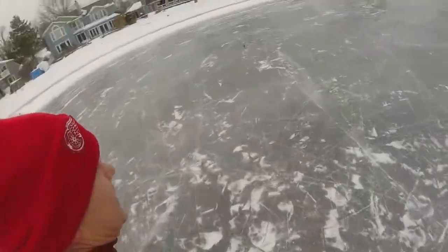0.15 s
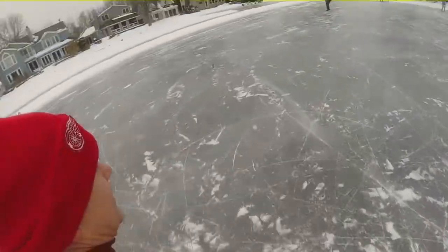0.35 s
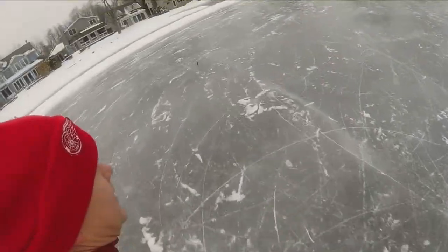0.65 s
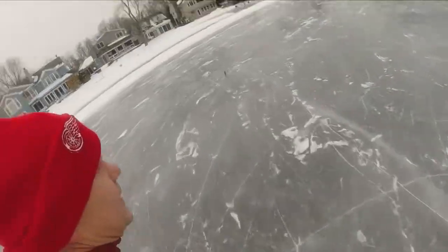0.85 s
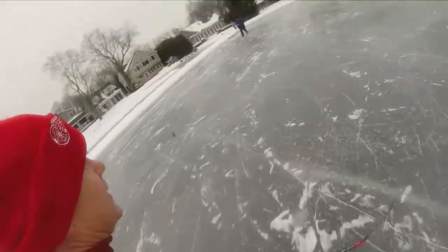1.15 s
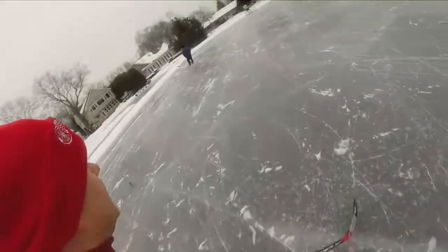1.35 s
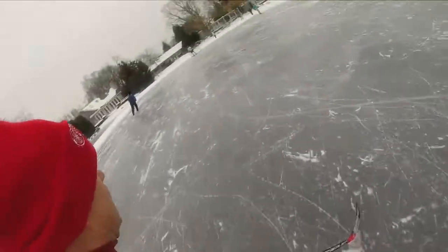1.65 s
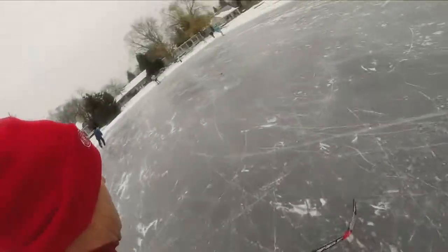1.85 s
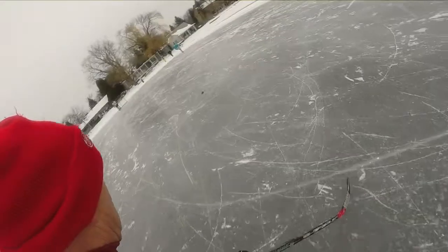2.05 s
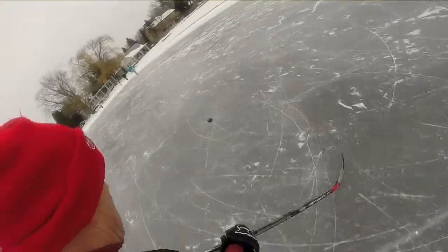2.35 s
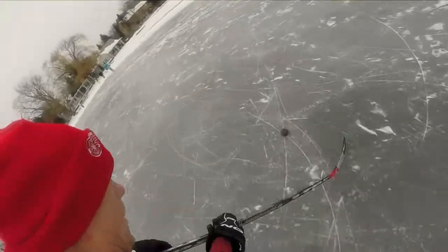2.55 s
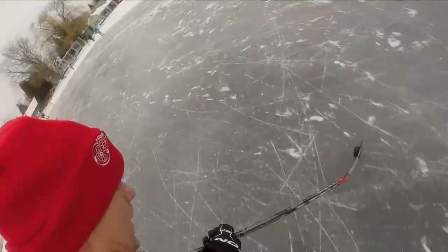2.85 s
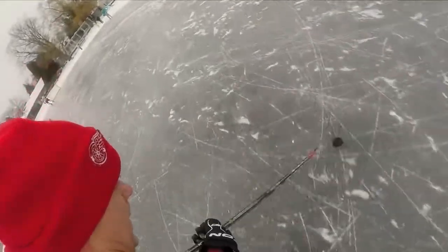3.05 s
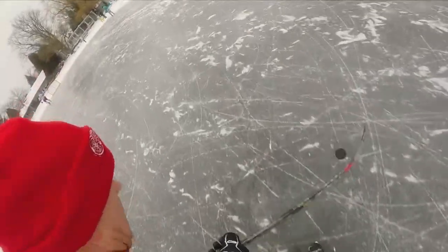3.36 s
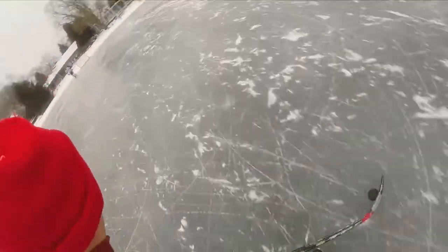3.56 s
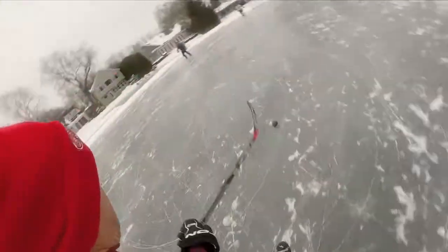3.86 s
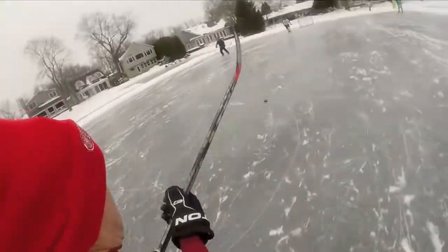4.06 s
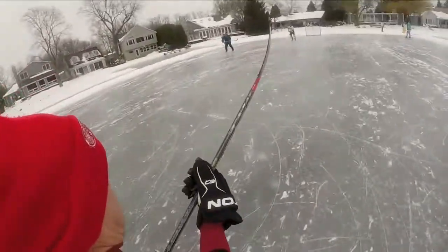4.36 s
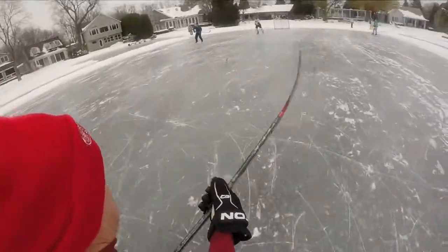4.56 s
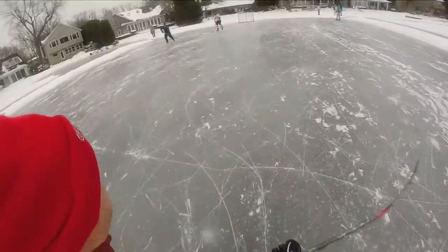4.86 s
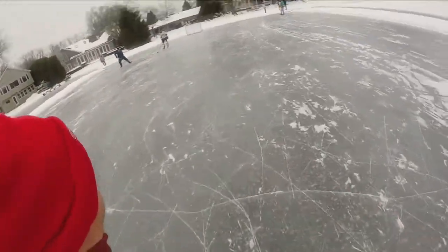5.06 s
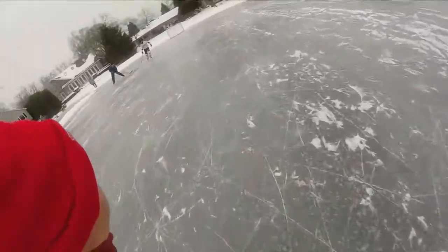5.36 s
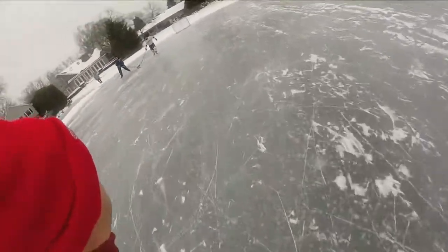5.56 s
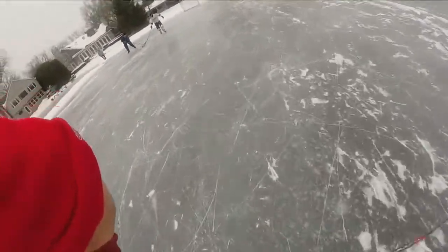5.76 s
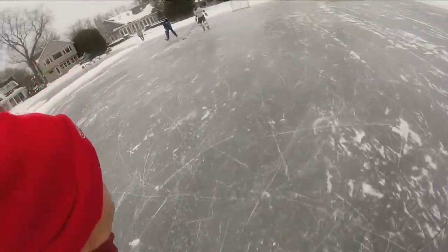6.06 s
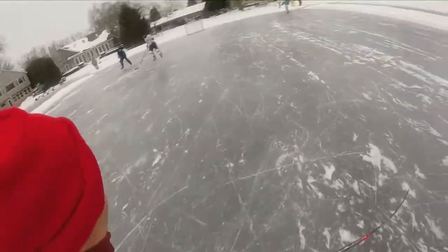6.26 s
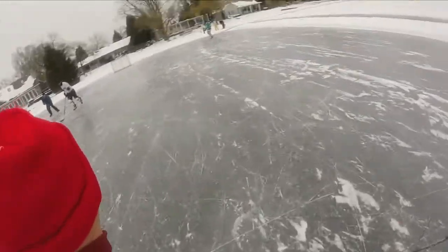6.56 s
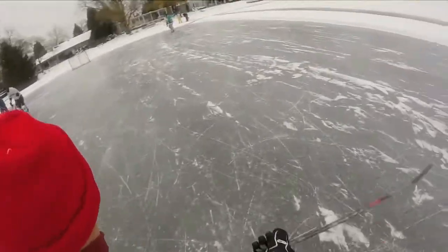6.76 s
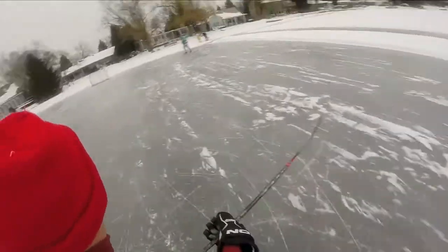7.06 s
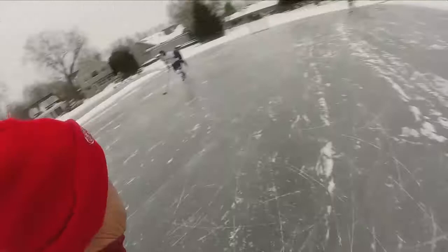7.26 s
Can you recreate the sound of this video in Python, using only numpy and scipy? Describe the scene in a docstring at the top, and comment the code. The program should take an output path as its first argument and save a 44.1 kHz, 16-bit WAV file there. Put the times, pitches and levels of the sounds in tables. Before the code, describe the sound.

Close, dry outdoor sound from a camera worn by a skater on rough lake ice. Blades crunch in short pushes, then glide with a thin, airy ring. A very loud stick crack lands after two and a half seconds, followed by lesser puck taps and a crisp spray of shaved ice. Grinding pushes and glides continue over low wind buffeting, ending with a heavier scrape.

```python
"""Skating with a stick and puck on rough ice

Blades grind in each push and sing in each glide: noise and tiny ice breaks pass through filters.
A stick cracks against puck and ice as fading tones with grit, and drags with a thin rasp.
Ice chips spray, cracks tick, toes scuff and bumps thud in the camera mount, over wind and faint hiss.
Loud peaks turn the gain down, and it slowly creeps back."""
import sys
import numpy as np
from scipy import signal
from scipy.fft import rfft, irfft, next_fast_len
from scipy.io import wavfile
from scipy.ndimage import uniform_filter1d, map_coordinates

SR = 44100
rng = np.random.default_rng(int(sys.argv[2]) if len(sys.argv) > 2 else 0)


def master(y):
    """Save y as 16-bit WAV."""
    cut = np.clip(np.atleast_2d(y).T, -1, 1)
    pcm = np.round(cut * 32767)  # scale
    wavfile.write(sys.argv[1], SR, pcm.astype(np.int16))


N = 326340

# Levels in the tables are relative: shares, trims and filters in the functions may still shift them.
# a skater leans on an edge: (most pressure t/s, rise t/s, fall t/s, grind level/dB, ring level/dB)
PUSHES = [(0.65, 0.095, 0.065, -50, -46.5), (0.74, 0.097, 0.088, -45.5, -60),
          (0.87, 0.031, 0.025, -48, -47.5), (1.13, 0.22, 0.12, -47, -50), (2.63, 0.069, 0.094, -46.5, -55),
          (3.02, 0.074, 0.051, -52.5, -58), (3.36, 0.077, 0.064, -49.5, -57),
          (3.71, 0.082, 0.27, -46.5, -56), (4.18, 0.066, 0.081, -41.5, -36), (4.31, 0.076, 0.052, -45, -43),
          (4.439, 0.043, 0.023, -48.5, -47), (4.64, 0.053, 0.14, -51, -51),
          (5.25, 0.061, 0.12, -47.5, -49.5), (6.42, 0.3, 0.21, -51.5, -54),
          (6.83, 0.07, 0.068, -52.5, -55.5), (7.02, 0.053, 0.023, -50, -45), (7.29, 0.12, 0.56, -41.5, -48)]
# a blade runs along its length: (start t/s, end t/s, song level/dB, hiss level/dB, whistle f/Hz,
# whistle half width f/Hz, whistle level/dB, lower band against the whistle level/dB)
GLIDES = [(1.278, 2.125, -51, -56.5, 6150, 280, -70, 0.5), (2.12, 2.803, -62, -60.5, 5830, 400, -77, 4),
          (3.533, 4.478, -52.5, -54.5, 6220, 400, -62, -14), (4.678, 4.768, -59, -53, 8200, 900, -76, 2),
          (5.04, 5.705, -67, -59.5, 6230, 280, -66, 9), (5.455, 5.72, -58.5, -53.5, 8100, 700, -72, -5),
          (5.707, 6.176, -70, -57.5, 6200, 380, -75, 10)]
# roughness of the ice underfoot, felt as vibration: (t/s, level/dB)
BUMPINESS = [(0.0, -48), (0.9, -48.5), (1.3, -49), (1.57, -50), (2.06, -57), (2.29, -53), (2.49, -48),
             (2.78, -60), (3.73, -46.5), (4.18, -46.5), (4.74, -54.5), (5.36, -46.5), (5.61, -47.5),
             (5.85, -43.5), (6.04, -50.5), (6.76, -56.5), (6.9, -46), (7.13, -50.5), (7.32, -39),
             (7.4, -40)]
# colour of a blade's broad ring: (f/Hz, level/dB)
RING_SPECTRUM = [(300, -24.5), (650, -24), (850, -17.5), (1050, -8.5), (1250, -3.5), (1390, -0.5),
                 (1550, -6.5), (1850, -4), (2800, -28.5), (4500, -63.5)]
# colour of the grinding ice: (f/Hz, level/dB)
GRIND_SPECTRUM = [(150, -25.5), (400, -9), (620, -11.5), (850, -1.5), (1020, -11), (1500, -11), (1950, 1),
                  (2450, 0.5), (2900, -4.5), (3250, -11), (3900, -9.5), (5000, -24.5), (8000, -41.5),
                  (14000, -62)]
# colour of the edge's hiss: (f/Hz, level/dB)
HISS_SPECTRUM = [(1500, -33), (2800, 9), (3150, 8.5), (3550, 8.5), (4300, 1), (4700, 2), (5100, -2),
                 (5650, 3.5), (6450, -5), (6900, -8), (8100, -14), (10000, -13.5), (12200, -18.5),
                 (15000, -48)]
# narrow resonances of a freely gliding blade: (f/Hz, level/dB)
SONG_SPECTRUM = [(700, -32), (1150, -10), (1290, -2.5), (1390, 6.5), (1540, 4.5), (1720, -5), (2400, -31.5),
                 (2850, -2), (3150, -13), (3520, -12), (3900, -39), (5500, -48)]
# a toe scuffs: (most pressure t/s, rise t/s, fall t/s, level/dB, pitch f/Hz)
SCUFFS = [(0.635, .03, 0.046, -42.5, 1930), (0.735, 0.029, 0.027, -47, 2280),
          (1.142, 0.0078, 0.0057, -34, 2150), (5.248, 0.0093, 0.011, -41.5, 1840),
          (6.985, 0.017, 0.026, -48.5, 1880), (7.025, 0.016, 0.012, -37, 1670)]
# an edge shaves the ice in a turn: (t/s, level/dB)
SHAVE = [(3.5, -49.5), (3.59, -51), (3.66, -37), (3.712, -35.5), (3.745, -47.5), (3.795, -60), (3.86, -69)]
# colour of the flying ice: (f/Hz, level/dB)
SPRAY_SPECTRUM = [(900, -18), (1450, -11), (1750, -2), (2150, 3.5), (2550, -0.5), (3050, 1), (3400, 5.5),
                  (3950, 2), (4400, -11), (4800, 5.5), (5200, -3), (6200, -2.5), (7900, -16.5),
                  (10000, -13), (12000, -24), (15000, -37)]
# the stick strikes puck or ice: (t/s, peak level/dB, main pitch f/Hz, its lift level/dB,
# second pitch f/Hz, its lift level/dB, thud level/dB, low knock level/dB, hollow ring level/dB,
# treble tilt level/dB, top against snap level/dB)
CLACKS = [(1.42, -23, 3870, 14, 1980, 8, -10, -6, 7, 10, -6),
          (2.662, -7.6, 3970, 7.5, 2850, 5.5, -12, -9, 7.5, 27.5, -8),
          (2.678, -30, 6300, 9, 1840, 3, -20, -8, -7, 5, -14),
          (3.145, -23, 3700, 13, 1180, 5, -15, -5, 0, -4, 5),
          (3.198, -32, 3040, 0, 1240, 5, -3, 3, 1, 6, -12),
          (3.451, -13.5, 2970, 7.5, 4170, 9.5, -13, -25, -11, 1, -2.5),
          (3.564, -21, 2070, 13, 3440, 2, -8, -8, 0, -5, -11),
          (5.58, -25.5, 1670, 21, 2530, 4, 0, -1, 2, -6.5, -7.5),
          (5.587, -31.5, 1680, 13, 6500, 9, -9, -11, 0, -3, -7),
          (6.4321, -18.5, 2510, 14.5, 1240, 4, -16, 5, -3, -49, -4)]
# tones in every blow: (f/Hz, starting level/dB, time to fall 60 dB t/s)
BLOW_MODES = [(855, -8.5, 0.024), (1150, -23, 0.028), (1431, -5.5, 0.033), (1834, -21, 0.14),
              (1907, -3.5, 0.023), (2240, -2.5, 0.023), (2564, -6.5, 0.023), (2930, 0, 0.019),
              (3390, 2.5, 0.0093), (3750, -8, 0.015), (3994, 0, 0.0088), (4680, 2.5, 0.0063),
              (5500, -7, 0.0063), (5950, -3, 0.011), (6600, -11, 0.012), (9460, -12.5, 0.0085)]
# thud, knock, body, hollow ring, shoulder, snap and top of a blow: (f/Hz)
CONTACT_HZ = [550, 900, 1450, 1950, 2800, 5600, 14500]
# blades and puck tick over cracks and chips: (t/s, peak level/dB, main pitch f/Hz,
# low knock level/dB, treble tilt level/dB)
TICKS = [(0.11, -44.5, 910, -2, -15), (0.278, -40, 1180, -4, -38), (0.517, -42.5, 1756, 3, -24),
         (0.55, -38, 1930, -8, -34), (0.653, -36.5, 1380, -14, -25), (1.271, -36.5, 1240, -5, -39),
         (2.164, -37, 2050, 6, -23), (2.243, -46, 1500, 9, -23), (2.331, -44.5, 1980, 15, -26),
         (2.539, -44.5, 1520, -10, 28), (2.703, -45, 6000, -12, 1), (2.847, -41, 2710, -8, -4),
         (2.907, -41, 1890, -17, 8), (2.948, -44.5, 1400, 12, 23), (2.987, -48.5, 5600, -7, 1),
         (3.233, -42, 1880, 0, 27), (3.431, -40, 2930, -20, -4), (3.747, -40, 2800, -8, 14),
         (3.761, -36.5, 3840, -14, 29), (3.79, -40, 4750, -12, 16), (3.833, -35, 2290, -23, 5),
         (4.066, -45, 4900, -10, 9), (4.092, -37, 1400, -9, -16), (4.279, -46, 6540, -12, 22),
         (4.436, -47, 5770, -2, 10), (4.552, -36.5, 2360, -1, 0), (5.762, -37.5, 1430, -18, -32),
         (5.827, -37.5, 1700, 6, -8), (5.94, -40.5, 2100, -17, -10), (5.982, -43.5, 2500, -10, -9),
         (6.762, -44, 2400, -8, -16), (6.794, -41, 2180, -1, -22), (6.93, -44, 2100, 5, -21),
         (7.135, -37.5, 2430, -4, -9)]
# the stick blade drags, one list a stroke: (t/s, level/dB)
DRAGS = [
    [(6.14, -85), (6.18, -65.5), (6.33, -66), (6.45, -63), (6.49, -70), (6.51, -84)],
    [(7.15, -90), (7.21, -69), (7.26, -58.5), (7.4, -62.5)],
]
# resonances of the dragged stick blade: (f/Hz, width f/Hz, level/dB)
DRAG_MODES = [(2630, 930, 17), (4520, 380, 7), (5680, 190, 16.5), (6420, 300, 8), (7430, 350, 4),
              (10030, 400, 1), (12100, 900, -12)]
# bumps reach the camera mount: (t/s, peak level/dB, upper tones level/dB)
JOLTS = [(1.116, -28, -5), (1.143, -26, 1), (1.27, -30.5, 1), (2.101, -28.5, -25), (2.166, -22.5, -20),
         (2.239, -26, -22), (2.327, -28, -16.5), (2.44, -33, -16), (2.548, -24.5, -20), (6.433, -19, -6)]
# tones of the camera mount: (f/Hz, starting level/dB, time to fall 60 dB t/s)
MOUNT_MODES = [(138.7, -5.5, 0.29), (194, 1.5, 0.1), (255, -4, 0.091), (342, -7.5, 0.13)]
# wind on the microphone: (t/s, level/dB)
GUSTS = [(0, -35.5), (0.45, -25.5), (0.62, -22.5), (0.8, -33), (1.02, -26.5), (1.45, -35), (1.74, -27),
         (2.55, -31), (3.0, -37), (3.2, -29.5), (3.8, -26.5), (4.28, -29.5), (4.6, -34.5), (5.04, -28),
         (6.28, -32.5), (6.47, -27), (6.76, -42.5), (7.06, -30), (7.4, -36)]
# colour of the wind's buffeting: (f/Hz, level/dB)
BUFFET_SPECTRUM = [(10, -23.5), (24, -5.5), (37, 1.5), (45, 0), (54, -1), (68, -10.5), (95, -24),
                   (150, -38), (400, -64), (900, -120)]
# colour of the mount's shudder: (f/Hz, level/dB)
SHUDDER_SPECTRUM = [(60, -40), (110, -7.5), (142, 3), (168, -4.5), (195, -4), (245, -10.5), (295, -17),
                    (350, -20.5), (450, -24), (700, -30), (1500, -72.5)]
# colour of the steady hiss: (f/Hz, level/dB)
AIR_SPECTRUM = [(300, 23), (2500, 9.5), (5000, 9.5), (8000, 2.5), (12000, -3.5), (15000, -13)]

SWELL_SHAPE = 1.4  # 1 = pointed, 2 = rounded
BITE_HISS_DB = -9  # hiss of a pushed edge against its grind
BITE_RING_DB, BITE_SONG_DB = -5.5, -3.5  # broad and narrow share of a pushed blade's ring
SET_DOWN_S, LIFT_S, GLIDE_FADE_DB_PER_S = 0.011, 0.04, 5
COAST_RING_DB, COAST_GRIND_DB, COAST_HISS_DB = -58.5, -57, -64  # at average bumpiness
COAST_FOLLOWS = 0.56  # dB of coasting noise per dB of bumpiness
UNDER_WHISTLE_RATIO, OVER_WHISTLE_RATIO = 0.567, 1.66  # lower and higher band against the whistle's pitch
OVER_WHISTLE_DB = -20  # higher band against the whistle
SCUFF_OCTAVES = 0.4  # half width of a scuff's band
CONTACT_S = 0.0005  # how fast a blow builds
SHOULDER_SHARE = 0.47  # of the snap's treble lift that is reached at the shoulder
TICK_LIFT_DB, TICK_THUD_DB = 9.5, 0  # lift of a tick's main pitch; its thud against its knock
DRAG_BEND, DRAG_BENDS_PER_S, DRAG_SKIRT_DB = 0.019, 9, -6.5  # pitch shift as a fraction; rate; wide skirts
DUCK_ABOVE_DB, DUCK_SHARE = -5.5, 0.31  # threshold; share of the excess taken off
DUCK_ATTACK_S, RECOVER_DB_PER_S = 0.0098, 2
TOP_HZ = 15200


def skates():
    """The same breaking grains drive the blade's ring, its grind, the hiss of its edge and its song."""
    ring_gain, grind_gain, hiss_gain, song_gain = blade_levels()
    splinters = chips(rate=700, centre_hz=4800, spread=1.3, life=2, spread_db=2.4)
    breaks = fractures(rate=800, spread_db=3) + amp(-2) * splinters
    ring = friction(RING_SPECTRUM, breaks, grain_db=-6.5, chatter_db=3, patchy_db=0.5)
    grind = friction(GRIND_SPECTRUM, breaks, grain_db=-8.0, chatter_db=2.2, patchy_db=1.5)
    hiss = friction(HISS_SPECTRUM, breaks, grain_db=0.5, chatter_db=3.0, patchy_db=3.0, chatter_rate=220)
    song = friction(SONG_SPECTRUM, breaks, grain_db=-18.0, chatter_db=1.3, patchy_db=1.6, chatter_rate=25)
    return ring_gain * ring + grind_gain * grind + hiss_gain * hiss + song_gain * song


def blade_levels():
    """Gains of ring, grind, hiss and song: coasting, pushes and glides add in power."""
    bumps_db, = curves(BUMPINESS)
    coast = amp(COAST_FOLLOWS * (bumps_db - bumps_db.mean()))
    ring, grind, hiss = [(amp(db) * coast) ** 2 for db in (COAST_RING_DB, COAST_GRIND_DB, COAST_HISS_DB)]
    song = np.zeros(N)
    for peak_s, rise_s, fall_s, grind_db, ring_db in PUSHES:
        pressure = swell(peak_s, rise_s, fall_s)
        ring += (amp(ring_db + BITE_RING_DB) * pressure) ** 2
        song += (amp(ring_db + BITE_SONG_DB) * pressure) ** 2
        grind += (amp(grind_db) * pressure) ** 2
        hiss += (amp(grind_db + BITE_HISS_DB) * pressure) ** 2
    for start_s, end_s, song_db, hiss_db, *_ in GLIDES:
        speed = run_out(start_s, end_s)
        song += (amp(song_db) * speed) ** 2
        hiss += (amp(hiss_db) * speed) ** 2
    return np.sqrt([ring, grind, hiss, song])


def swell(peak_s, rise_s, fall_s):
    """Pressure builds to a peak and lets go."""
    t = np.arange(N) / SR - peak_s
    return np.exp(-np.abs(t / np.where(t < 0, rise_s, fall_s)) ** SWELL_SHAPE)


def run_out(start_s, end_s):
    """A blade is set down, slowly loses speed and is lifted."""
    t = np.arange(N) / SR
    set_down = np.clip((t - start_s) / SET_DOWN_S, 0, 1)
    lift = np.clip((end_s - t) / LIFT_S + 0.5, 0, 1)
    return set_down * lift * amp(-GLIDE_FADE_DB_PER_S * (t - start_s))


def whistles(flutter_db=4.5, patchy_db=3.5, drift_db=0.3, buzz_db=2.5):
    """Each gliding edge chatters in three airy bands, with a pitch of its own for each glide."""
    f, track = np.fft.rfftfreq(N, 1 / SR), np.zeros(N)
    flutter = amp(flutter_db * wobble(40) + drift_db * wobble(6.1) + buzz_db * wobble(300))
    rub = rfft(patchy(rng.standard_normal(N), patchy_db) * flutter)
    for start_s, end_s, _, _, hz, width_hz, db, under_db in GLIDES:
        middle, under, over = [unit(irfft(rub / (1 + ((f / ratio - hz) / width_hz) ** 2), N))
                               for ratio in (1, UNDER_WHISTLE_RATIO, OVER_WHISTLE_RATIO)]
        bands = middle + amp(under_db) * under + amp(OVER_WHISTLE_DB) * over
        track += amp(db) * run_out(start_s, end_s) * bands
    return track


def scuffs():
    """A toe digs in and rasps briefly in one band."""
    f, track = np.fft.rfftfreq(N, 1 / SR), np.zeros(N)
    rasp = rfft(patchy(fractures(rate=2500, spread_db=2), depth_db=2))
    for peak_s, rise_s, fall_s, db, hz in SCUFFS:
        band = 1 / (1 + (np.log2((f + 1) / hz) / SCUFF_OCTAVES) ** 4)
        track += amp(db) * swell(peak_s, rise_s, fall_s) * unit(irfft(rasp * band, N))
    return track


def shave():
    """A leaning edge throws off a dense stream of chips, each with its own brief ring, in fine ice dust."""
    level_db, = curves(SHAVE, outside=-120)
    coarse = chips(rate=3000, centre_hz=4200, spread=1.5, life=2.5, spread_db=2)
    dust = fractures(rate=900, spread_db=3)
    flutter = amp(2.6 * wobble(200) + 1.8 * wobble(45))
    crunch = patchy(coarse + amp(2) * dust, depth_db=1.2) * flutter
    return amp(level_db + 2.0) * unit(coloured(crunch, SPRAY_SPECTRUM))


def clacks():
    """The hollow stick blade cracks against puck and ice."""
    track = np.zeros(N)
    for s, db, main_hz, main_db, second_hz, second_db, *contact in CLACKS:
        favoured = [(main_hz, main_db), (second_hz, second_db)]
        add(track, s, blow(favoured, *contact, crush_t60=0.017), db)
    return track


def blow(favoured, thud_db, knock_db, hollow_db, tilt_db, top_db, crush_t60,
         crush_db=2, rattle_t60=0.084, rattle_db=-25, spot_octaves=0.24):
    """A blow rings fading tones and crushes some ice; the spot and hardness of contact set its colour."""
    t = np.arange(SR // 6) / SR
    ring = np.zeros(len(t))
    for k, (hz, level_db, t60) in enumerate(BLOW_MODES):
        fade = amp(level_db + rng.normal(0, 1.0) - 60 * t / t60)
        ring += (-1) ** k * fade * np.sin(2 * np.pi * hz * t + rng.normal(0, 0.9))
    grit = unit(coloured(rng.standard_normal(len(t)), [(250, -5.0), (750, -0.5), (6300, -10.0),
                                                     (7800, -25.5), (12500, -25.5), (15000, -38.0)]))
    # a short crush, then a weaker, longer rattle
    grit_fade = amp(crush_db - 60 * t / crush_t60) + amp(rattle_db - 60 * t / rattle_t60)
    hit = (ring + grit * grit_fade) * (1 - np.exp(-(t / CONTACT_S) ** 2))
    # the struck spot favours the tones near one or two pitches
    for hz, lift_db in favoured:
        hit = coloured(hit, [(hz / 2 ** spot_octaves, 0), (hz, lift_db), (hz * 2 ** spot_octaves, 0)])
    # a harder contact tilts the treble up, a heavier one knocks more
    snap_db = tilt_db * np.log2(CONTACT_HZ[4] / CONTACT_HZ[3])
    levels_db = [thud_db, knock_db, 0, hollow_db, SHOULDER_SHARE * snap_db, snap_db, snap_db + top_db]
    return coloured(hit, list(zip(CONTACT_HZ, levels_db)))


def ticks():
    """Cracks and loose chips give small, light blows."""
    track = np.zeros(N)
    for s, db, main_hz, knock_db, tilt_db in TICKS:
        tick = blow([(main_hz, TICK_LIFT_DB)], knock_db + TICK_THUD_DB, knock_db, 0, tilt_db,
                    top_db=1, crush_t60=0.022)
        add(track, s, tick, db)
    return track


def drags():
    """The stick blade slides with a thin, bright rasp; its resonances wander as it flexes."""
    level = sum(amp(curves(stroke, outside=-120)[0]) for stroke in DRAGS)
    f = np.fft.rfftfreq(N, 1 / SR)
    rasp = rfft(patchy(fractures(rate=6000, spread_db=1.5), depth_db=4.0))
    flex = np.clip(0.5 + 0.5 * wobble(DRAG_BENDS_PER_S), 0, 1)
    # blend between a slightly lower and a slightly higher set of resonances
    slack, stiff = [unit(irfft(rasp * stick_resonances(f / ratio), N))
                    for ratio in (1 - DRAG_BEND, 1 + DRAG_BEND / 2)]
    return amp(15.5) * level * unit((1 - flex) * slack + flex * stiff)


def stick_resonances(f):
    """Each resonance of the stick blade is a flat-topped peak on a wide skirt."""
    gain = np.zeros(len(f))
    for hz, width_hz, db in DRAG_MODES:
        offset = (f - hz) / width_hz
        peak = 1 / (1 + (offset * 1.2) ** 4)
        skirt = amp(DRAG_SKIRT_DB) / (2 + offset ** 2)
        gain += amp(db) * (peak + skirt)
    return gain


def jolts(attack_s=0.00087, creak_db=-14, creak_t60=0.095):
    """Bumps travel up through the skater, and the camera mount thuds with low tones and a creak."""
    track, t = np.zeros(N), np.arange(SR // 3) / SR
    for s, db, upper_db in JOLTS:
        thud = np.zeros(len(t))
        for hz, level_db, t60 in MOUNT_MODES:
            fade = amp(level_db + rng.normal(0, 1) - 60 * t / t60)
            thud += fade * np.sin(2 * np.pi * (hz * t + rng.random()))
        creak = unit(coloured(rng.standard_normal(len(t)), [
            (200, -11.0), (400, 8.5), (620, -30.0), (850, 3.0), (1050, -5.0),
            (1400, -1.0), (2600, -2.5), (4000, -24.5), (9000, -45.0)]))
        bump = (thud + amp(creak_db - 60 * t / creak_t60) * creak) * (1 - np.exp(-t / attack_s))
        tone = [(250, 0), (340, upper_db + 4.0), (800, upper_db / 2 + 6.0)]
        add(track, s, coloured(bump, tone), db)
    return track


def wind():
    """Eddies buffet the microphone while its mount shudders over the bumps."""
    (buffet_db,), (bumps_db,) = curves(GUSTS), curves(BUMPINESS)
    buffet = amp(buffet_db - 0.9) * rumble(BUFFET_SPECTRUM, evenness=0.37)
    shudder = amp(bumps_db + 2.0) * rumble(SHUDDER_SPECTRUM, evenness=0.087)
    return buffet + shudder


def rumble(spectrum, evenness):
    """Low noise whose own random swells are partly evened out."""
    z = signal.hilbert(coloured(rng.standard_normal(N), spectrum))
    power = np.abs(uniform_filter1d(np.abs(z) ** 2, size=2600)) + 1e-20
    return unit(z.real / power ** (np.clip(evenness, 0, 1) / 2))


def air():
    """A faint even hiss lies under everything."""
    return amp(-61.5) * unit(coloured(rng.standard_normal(N), AIR_SPECTRUM))


def friction(spectrum, breaks, grain_db, chatter_db, patchy_db, chatter_rate=70):
    """Smooth sliding noise plus breaking grains, with a random flutter in level."""
    force = patchy(rng.standard_normal(N) + amp(grain_db) * breaks, patchy_db)
    chatter = amp(chatter_db * np.clip(wobble(chatter_rate), -2, 2))
    return unit(coloured(force * chatter, spectrum))


def fractures(rate, spread_db):
    """Tiny breaks of ice at random times, rate a second, most small and a few large."""
    sizes = amp(spread_db * np.minimum(rng.exponential(size=N), 3.5))
    return unit((rng.random(N) < rate / SR) * sizes * rng.choice([-1, 1], N))


def chips(rate, centre_hz, spread, life, spread_db):
    """Splinters snap off at random, each ringing at its own pitch (within spread octaves) for life cycles."""
    start, pitch, size = rng.random((int(rate * N / SR), 3)).T
    hz = np.clip(centre_hz * 2 ** (spread * (2 * pitch - 1)), 500, 14000)[:, None]
    gain = amp(spread_db * np.minimum(-np.log(1 - size), 4))[:, None]
    step = np.arange(SR // 120)
    cycles = hz * step / SR
    rings = gain * np.exp(-cycles / life) * np.sin(2 * np.pi * cycles)
    place = (start * N).astype(int)[:, None] + step
    return unit(np.bincount(place.ravel(), rings.ravel(), N)[:N])


def patchy(x, depth_db):
    """Every few milliseconds the contact favours different pitches."""
    z = signal.stft(x, nperseg=256)[2]
    field = uniform_filter1d(rng.standard_normal(z.shape), size=5, axis=0)
    field = uniform_filter1d(field, size=4, axis=1)
    return signal.istft(z * amp(depth_db * unit(field)), nperseg=256)[1][:N]


def amp(db):
    """Turn decibels into a plain gain."""
    return 10 ** (np.asarray(db) / 20)


def unit(x):
    """Scale to an average (RMS) level of 1."""
    return x / np.sqrt(np.mean(x ** 2) + 1e-20)


def along(points, hz):
    """Read (f/Hz, value) points on a log frequency axis."""
    f, v = np.transpose(points)
    return np.interp(np.log(hz + 1), np.log(f + 1), v)


def curves(rows, outside=None):
    """One value per sample for each column after the time."""
    s, *cols = np.transpose(rows)
    return [np.interp(np.arange(N) / SR, s, c, outside, outside) for c in cols]


def wobble(rate):
    """A smooth random curve with rate random points a second."""
    return map_coordinates(rng.standard_normal(int(N * rate / SR) + 4), [np.arange(N) * rate / SR])


def coloured(x, spectrum):
    """Filter x to this spectrum without any sound before its cause (minimum phase)."""
    m = 2 * next_fast_len(len(x) // 2 + SR // 8)
    cepstrum = irfft(np.log(amp(along(spectrum, np.fft.rfftfreq(m, 1 / SR)))))
    # fold the backward half onto the forward half
    cepstrum[1:m // 2] *= 2
    cepstrum[m // 2 + 1:] = 0
    return irfft(rfft(x, m) * np.exp(rfft(cepstrum)))[:len(x)]


def add(track, s, sound, db):
    """Mix a sound in at time s, its 2 ms RMS level peaking at db."""
    start = round(s * SR)
    peak = np.sqrt(uniform_filter1d(sound ** 2, size=88).max())
    track[start:start + len(sound)] += (amp(db) * sound / peak)[:N - start]


def gain_control(x):
    """A loud peak turns the gain down, and it creeps back up."""
    recovered_db = RECOVER_DB_PER_S * np.arange(N) / SR
    level_db = 20 * np.log10(np.abs(x[0]) + 1e-9)
    excess_db = DUCK_SHARE * np.maximum(level_db - DUCK_ABOVE_DB, 0)
    held_db = np.maximum.accumulate(excess_db + recovered_db) - recovered_db
    keep = np.exp(-1 / (DUCK_ATTACK_S * SR))
    return x * amp(-signal.lfilter([1 - keep], [1, -keep], held_db))


def scene():
    """All layers together, as one channel."""
    skating = skates() + whistles() + scuffs() + shave()
    stick_and_ice = clacks() + ticks() + drags()
    background = jolts() + wind() + air()
    return (skating + stick_and_ice + background)[None]


def record(dry):
    """The camera clips at full scale, ducks after loud peaks and cuts steeply above its band limit."""
    band = 1 / (1 + (np.fft.rfftfreq(N, 1 / SR) / TOP_HZ) ** 90)
    return irfft(rfft(gain_control(np.clip(dry, -1, 1))) * band, N)


dry = scene()
out = record(dry)
master(out)
```